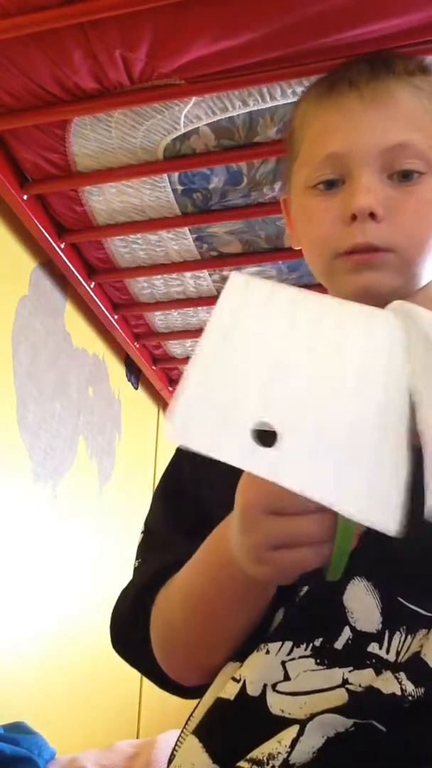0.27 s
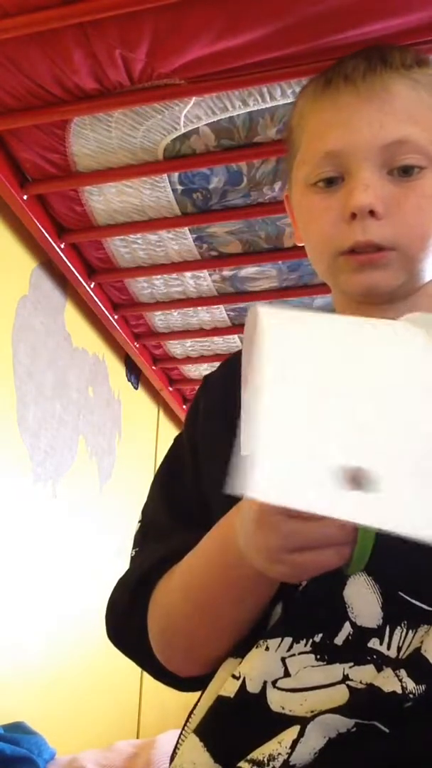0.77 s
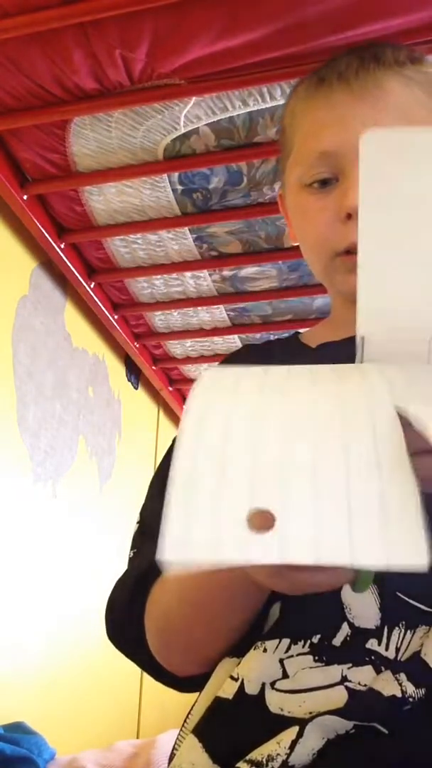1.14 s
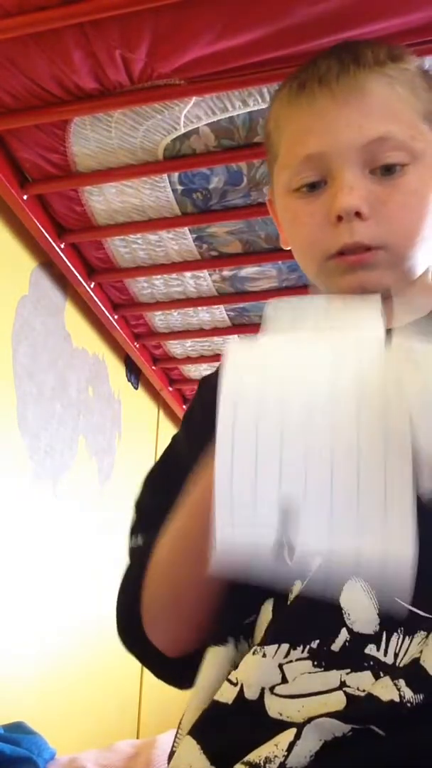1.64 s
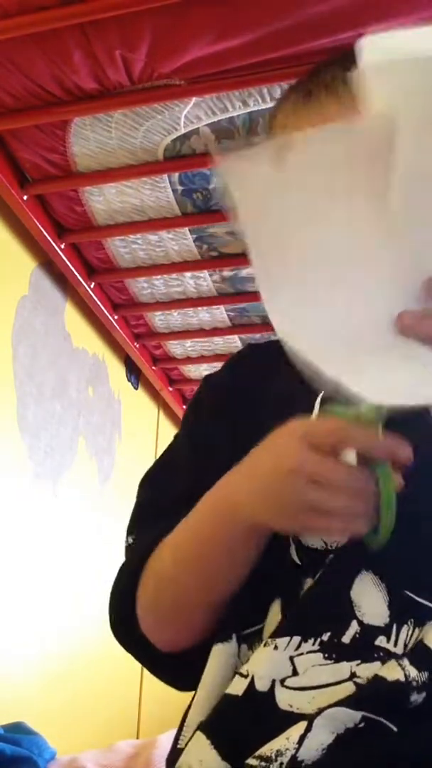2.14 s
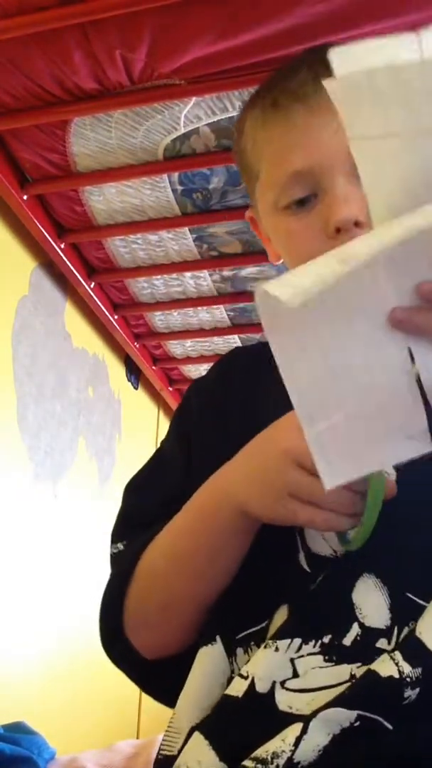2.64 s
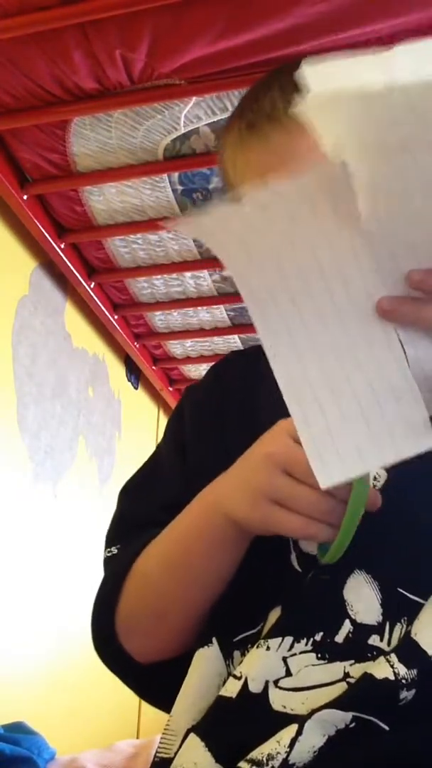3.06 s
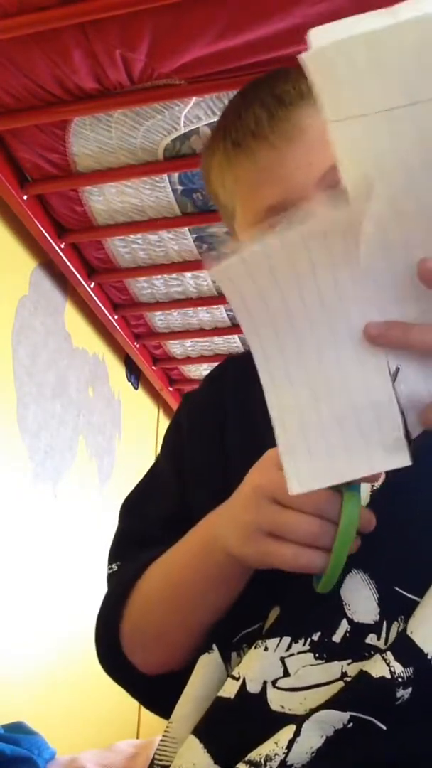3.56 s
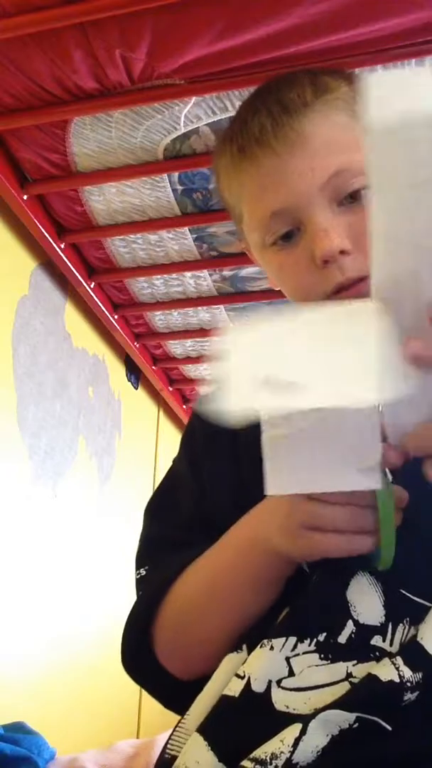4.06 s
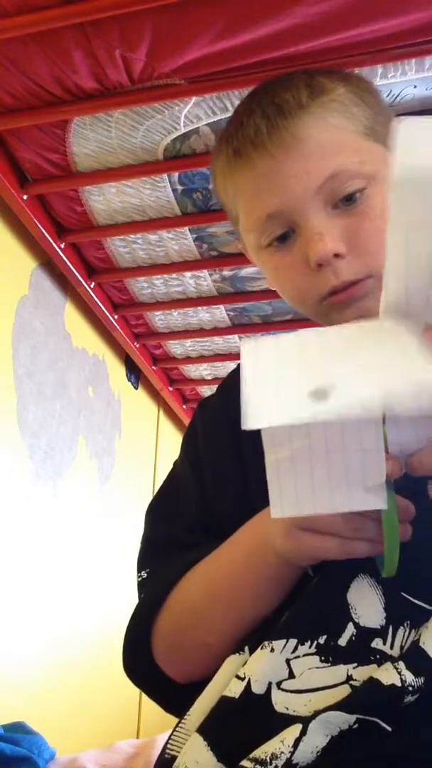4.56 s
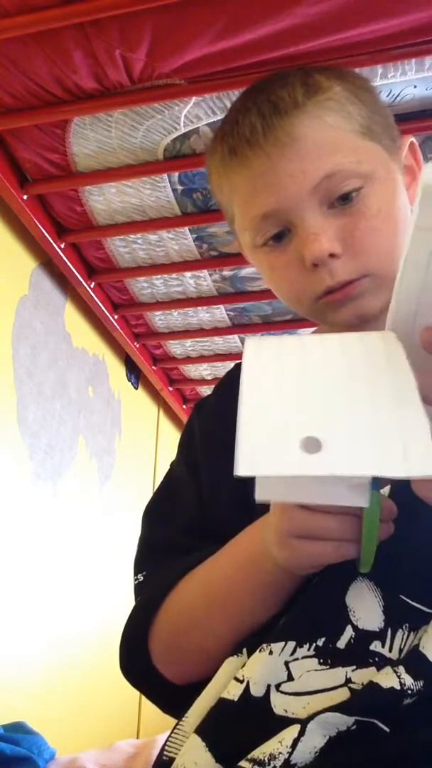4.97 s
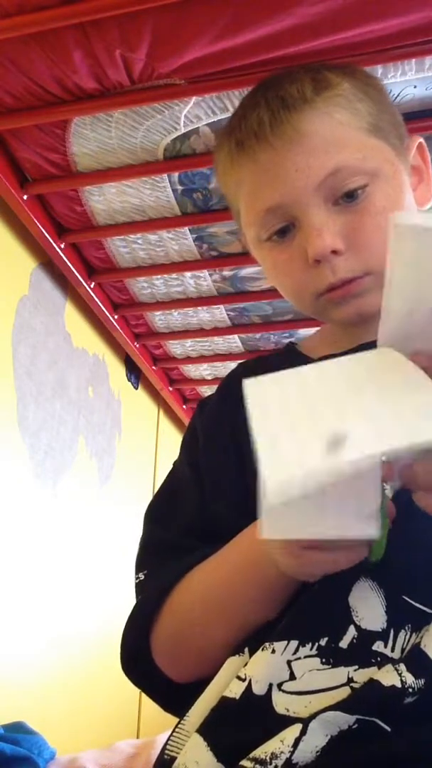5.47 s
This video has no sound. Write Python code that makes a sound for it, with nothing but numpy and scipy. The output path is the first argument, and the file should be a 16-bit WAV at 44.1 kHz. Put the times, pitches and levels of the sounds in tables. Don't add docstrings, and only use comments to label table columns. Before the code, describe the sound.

Hands turn and flex a sheet of notebook paper near a phone in a small, soft room. A faint brush leads to quick crackles, hissing strokes and a crisp cluster around two seconds. The middle turns quieter, with light rubbing and dull finger knocks, then a brighter burst of creases comes at five seconds and a last brush near the end. Low room rumble lies behind.

```python
import sys
import numpy as np
from scipy import signal
from scipy.fft import rfft, irfft
from scipy.io import wavfile
from scipy.ndimage import uniform_filter1d

SR = 44100
rng = np.random.default_rng(int(sys.argv[2]) if len(sys.argv) > 2 else 0)


def int16_out(signal):
    q = np.round(np.clip(np.atleast_2d(signal).T, -1, 1) * 32767)
    wavfile.write(sys.argv[1], SR, q.astype(np.int16))


def rack_gain(trim_db):
    fader = np.asarray(trim_db, float)
    return 10 ** (fader / 20)


N = 252252


def evened(x):
    return x / np.sqrt(np.mean(x ** 2) + 1e-20)


def smooth_noise(shape, width):
    once = uniform_filter1d(rng.standard_normal(shape), width)
    return evened(uniform_filter1d(once, width))


def read(points, hz):
    f, value = np.transpose(points)
    return np.interp(np.log(hz + 1), np.log(f + 1), value)


def filtered(x, points):
    gain = rack_gain(read(points, np.fft.rfftfreq(N, 1 / SR)))
    return evened(irfft(rfft(x) * gain, N))


def coloured(x, points, patchy_db, extra_db):
    hz, t, z = signal.stft(x, SR, nperseg=256, noverlap=192)
    over_hz = uniform_filter1d(rng.standard_normal(z.shape), 3, 0)
    patches = evened(uniform_filter1d(over_hz, 40, 1))
    z = z * rack_gain(read(points, hz)[:, None] + patchy_db * patches + extra_db)
    return signal.istft(z, SR, nperseg=256, noverlap=192)[1][:N]


def causal(db):
    log = np.maximum(db, -100) * np.log(10) / 20
    circle = np.concatenate([log, log[..., -2:0:-1]], axis=-1)
    phase = -signal.hilbert(circle).imag[..., :log.shape[-1]]
    return np.exp(log + 1j * phase)


def slips(shape, per_s, spread_db, hiss):
    hit = rng.random(shape) < per_s / SR
    size = rng.exponential(1, shape)
    sign = np.sign(rng.standard_normal(shape))
    clicks = hit * sign * rack_gain(spread_db * np.minimum(size, 4))
    return evened(clicks) + hiss * rng.standard_normal(shape)


# (time [s], pressure [dB])
LIGHT_DRAG = [(0.0, -73.5), (0.85, -70), (1.07, -66), (1.2, -54), (1.33, -50), (1.5, -52.5), (1.88, -56.5),
              (2.06, -68), (2.21, -47.5), (2.34, -57), (2.5, -76), (2.88, -67), (3.0, -73), (3.38, -73),
              (3.56, -56), (4.5, -63), (5.18, -66), (5.66, -75)]
# (start [s], hold [s], pressure [dB], brightness [dB], fizz [dB])
JERKY_STROKES = [(0.0, 0.0014, -46.5, -8, -18), (0.187, 0.008, -33, -9, -15), (0.6, 0.016, -40.5, -3, -8),
                 (0.652, .01, -40.5, -1, -8.5), (0.866, 0.13, -38.5, 3, -1.5),
                 (2.048, 0.014, -63.5, 8, 1.2), (2.104, 0.02, -29, -2, -5),
                 (2.788, 0.042, -39.5, -2.3, -16.5), (3.387, 0.05, -50.5, -6, -23),
                 (3.572, 0.018, -51, 2, -10), (4.111, 0.02, -50, -6, -16), (4.455, 0.15, -57, -6, -16),
                 (4.957, 0.0035, -50, -7, -18), (5.019, 0.044, -37.5, -3, -11),
                 (5.204, .002, -39.5, -2, -14), (5.545, 0.01, -41, -19, -30)]
# (full pressure [s], hold [s], pressure [dB], brightness [dB], fizz [dB])
SWELLING_STROKES = [(0.236, 0.0029, -31.5, -1, -13), (0.832, .002, -59, -3, -12),
                    (0.99, 0.031, -37.5, -1.5, -11.5), (1.122, 0.015, -48.5, -2, -8),
                    (1.237, 0.052, -43.5, 0.5, -7.5), (1.36, 0.021, -44, 14.5, -3),
                    (1.592, 0.0017, -45.5, 19.5, 18), (1.63, 0.047, -45.5, -14, -1),
                    (1.706, 0.011, -31, -0.5, -8.5), (1.915, 0.012, -47, 0, -6), (2.24, 0.03, -49, 5, 3),
                    (2.295, 0.0043, -49, -5, -13), (2.704, 0.001, -40, -7.5, -20),
                    (3.03, 0.01, -51.5, -4.5, -14), (3.193, 0.03, -49, -5, -11),
                    (3.327, 0.0022, -54, -4, -15), (3.44, 0.0012, -46.5, 2, -4),
                    (3.654, 0.024, -38.5, -2.5, -17), (3.81, 0.0022, -48.5, -4, -15),
                    (3.915, 0.055, -50, -7, -14), (4.01, 0.053, -59.5, 16, 12),
                    (4.27, 0.012, -56, -23, -23), (4.824, 0.0067, -48, -9, -16), (5.6, 0.04, -41, 2.5, -8),
                    (5.715, .004, -54, 1.5, -6)]
# (time [s], depth [dB])
HAND_LIFTS = [(0.169, 17), (1.203, 9.5), (1.49, 11), (2.163, 3.5), (2.76, 2), (3.365, 5), (3.735, 10),
              (3.854, 7.5), (4.228, 10), (4.77, 13), (5.643, 16.5)]


def hand(t):
    power = rack_gain(2 * np.interp(t, *np.transpose(LIGHT_DRAG)))
    bright, fizz = power * -1, power * -7.5
    # (strokes, rise [dB/s], fall [dB/s])
    for strokes, rise, fall in [(JERKY_STROKES, 2499.5, 361), (SWELLING_STROKES, 290, 324)]:
        for s, hold, db, bright_db, fizz_db in strokes:
            before, after = np.maximum(s - t, 0), np.maximum(t - s - hold, 0)
            stroke = rack_gain(2 * (db - rise * before - fall * after))
            power = power + stroke
            bright = bright + stroke * bright_db
            fizz = fizz + stroke * fizz_db
    lift_s = 0.014
    lift_db = sum(db * np.exp(-((t - s) / lift_s) ** 2) for s, db in HAND_LIFTS)
    return 10 * np.log10(power) - lift_db, bright / power, fizz / power


# (frequency [Hz], level [dB])
FIBRE_COLOUR = [(410, -40), (700, -27.5), (863, -17.5), (1110, -8), (2100, -4), (7010, -9), (13700, -17),
                (15200, -20), (16000, -39.5)]
# (frequency [Hz], width [Hz], level [dB])
CURVED_PANELS = [
    (2730, 310, 4.5),
    (4720, 310, 5),
    (6900, 480, 4),
    (8530, 350, -4.5),
    (3700, 330, -3),
]
# (frequency [Hz], level [dB])
FLAP_COLOUR = [(35, -42.5), (60, -10), (184, -4), (312, -8), (515, -0.5), (850, -12.5), (1300, -14.5),
               (1690, -33), (2860, -120)]


def sliding():
    t = np.arange(N) / SR
    clumps = smooth_noise(N, 70)
    drive = evened(slips(N, per_s=4000, spread_db=2.7, hiss=1.0) * rack_gain(2.2 * clumps))

    hz = np.fft.rfftfreq(256, 1 / SR)
    frames = np.arange(-(-N // 64) + 1) * 64 / SR
    pressure_db, bright_db, fizz_db = hand(frames)
    bright = np.interp(hz, [3000, 5200, 6200, 10500], [0, 1, 1, 0])[:, None]
    fizz = np.interp(hz, [6200, 10500], [0, 1])[:, None]
    upper_db = bright * (bright_db + 0.5) + fizz * (fizz_db + 8.0)

    bends = evened(uniform_filter1d(rng.standard_normal((len(CURVED_PANELS), len(frames))), 60))
    ring_db = 0
    for (centre, width, db), bend in zip(CURVED_PANELS, bends):
        distance = (hz[:, None] - centre * (1 + 0.07 * bend)) / width
        ring_db = ring_db + db * (1 + 0.45 * bend) / (1 + distance ** 2)
    rub = coloured(drive, FIBRE_COLOUR, patchy_db=2.8, extra_db=upper_db + ring_db)

    lumps = smooth_noise(N, 900)
    flap = filtered(rng.standard_normal(N) * rack_gain(2.6 * lumps), FLAP_COLOUR)
    pressure_db = np.interp(t, frames, pressure_db)
    flap_db = 0.62 * uniform_filter1d(pressure_db, 600) - 28.5
    return rack_gain(pressure_db + 9.0) * rub + rack_gain(flap_db) * flap


# (time [s], level [dB], ring [Hz], tilt [dB/octave])
CREASE_POPS = [(1.5325, -36, 9000, 6), (4.2718, -36, 3100, 0), (0.6518, -20, 2750, 2.5),
               (0.1952, -22, 3900, -1), (0.228, -18, 2630, 0), (2.0956, -26.5, 1760, -7),
               (2.1164, -12, 4700, 2), (1.7028, -15.5, 6260, 1.8), (2.2885, -21.5, 2260, -0.5),
               (4.825, -24.5, 5240, 0.5), (4.9415, -33.5, 2400, -3), (4.8766, -42, 2480, -6),
               (4.9697, -34, 2400, -3)]
# (time [s], level [dB], ring [Hz], tilt [dB/octave])
SHORT_TICKS = [(0.6303, -32.5, 3400, 10), (0.895, -30, 2560, -4.5), (1.1597, -40.5, 2880, 4.5),
               (1.4148, -38, 6930, 0.5), (1.6837, -50, 1170, 3), (1.6915, -28, 1730, -1),
               (1.8977, -38, 2560, 0), (1.9655, -31.5, 3020, 2), (2.1285, -20, 5190, 1),
               (2.1736, -22, 2180, -1.5), (2.618, -42.5, 2650, -8.5), (2.637, -30, 2500, -3),
               (2.8655, -39, 2060, -6), (3.6381, -34.5, 2200, -0.5), (4.919, -52.5, 2580, -2),
               (4.9787, -47, 2410, -1), (4.9902, -40.5, 2620, -1.5), (5.399, -60.5, 2490, -2),
               (5.4626, -48.5, 3200, -4.5), (5.6752, -43, 3050, 5)]
# (time [s], level [dB], ring [Hz], tilt [dB/octave])
FINGER_KNOCKS = [
    (0.0916, -44, 840, -8),
    (0.4835, -48, 800, -6.5),
    (2.501, -57, 695, -13),
    (2.607, -47.5, 650, -3.5),
    (2.9722, -43.5, 610, -11),
    (4.0614, -45, 600, -6.5),
    (4.2483, -52, 594, -6),
    (4.3323, -42, 1200, -5),
    (4.739, -53.5, 690, -5.5),
]
# (peak time [s], level [dB], ring [Hz], tilt [dB/octave], build-up [ms])
SLOW_BUCKLES = [(0.2834, -35, 3830, -0.5, 2.4), (0.3126, -33, 2200, 1.5, 5.3),
                (0.6486, -21.5, 7100, 4, 3.3), (1.0863, -43, 2810, -1, 5.3), (1.187, -47.5, 3250, 3, 2.3),
                (1.2404, -37, 1680, -6.5, 3.7), (1.2746, -39.5, 3270, 3.5, 7.7), (1.5965, -27, 6000, 1, 6),
                (1.3664, -33.5, 3320, -3, 3.7), (1.6483, -31.5, 5640, 0.5, 7.7),
                (1.7171, -25, 3700, -1.5, 5.8), (1.9175, -25.5, 2210, -1.9, 8.4),
                (1.979, -45, 6120, 2, 6.3), (3.4475, -34.5, 2460, 0, 3.3), (3.6251, -33, 4360, 1.5, 4.1),
                (4.9543, -28, 2240, 0, 1.4), (5.0255, -20.5, 7500, 0.5, 2.7), (5.031, -24, 4940, 1, 4),
                (5.0741, -29.5, 2980, 0.8, 1.3), (5.1149, -32.5, 2400, -1, 4.1),
                (5.2024, -23.5, 4680, -1.3, 3.9)]
# (peak time [s], level [dB], ring [Hz], tilt [dB/octave], tail [ms])
LONG_CRUMPLES = [(1.344, -38, 5500, 5, 10), (1.7055, -23, 4600, 0, 6), (2.2915, -29, 4000, 1, 4),
                 (3.215, -48, 2500, -3, 20), (0.1427, -40, 2850, -1, 3), (0.5836, -34, 7500, 2, 6),
                 (0.606, -34, 3000, 0, 6), (0.859, -47, 1400, 0, 10), (5.0188, -35.5, 5000, 2, 5),
                 (5.198, -27.5, 2500, -1.5, 4.8), (0.5991, -27.5, 7700, -0.5, 7.4),
                 (0.99, -41.5, 3300, 3, 18), (1.1141, -43, 7000, 0, 8.1), (1.26, -51, 1970, -9, 7.3),
                 (1.508, -31.5, 5130, 6.5, 10), (1.5548, -31.5, 5250, 3.5, 34), (1.584, -28, 5860, 2, 23),
                 (2.1085, -18, 4400, -2, 7.7), (2.698, -36.5, 2670, -5, 10), (2.826, -40.5, 2540, -7, 19),
                 (3.511, -47, 2380, -3.5, 13), (3.9186, -48, 2830, -3, 27), (3.959, -45, 2280, -5.5, 8.2),
                 (4.1081, -44, 1730, -6.5, 17), (4.195, -48, 1740, -8.5, 13.5),
                 (4.363, -54.5, 7460, 22, 23), (4.42, -52, 3100, -0.5, 7.5), (4.452, -48.5, 2800, 1, 54),
                 (4.4937, -45.5, 2600, -3, 21), (4.5618, -48, 3220, -0.5, 4.3), (5.571, -36, 2980, 1.5, 33),
                 (5.584, -39.5, 7400, 11, 8.5)]
# (time [s], peak [dB], ring [Hz], tilt [dB/octave])
FIBRE_PRICKS = [(0.1514, -43, 2880, 1), (0.1564, -45, 7000, 4), (0.1704, -46, 5500, 2),
                (0.1796, -36, 2420, 0), (0.5082, -52, 7000, 5), (0.7874, -52, 9000, 10),
                (0.8714, -30, 1200, -3), (1.2101, -38, 4670, 3), (1.44, -38, 9000, 6),
                (2.1894, -27, 5700, 3), (2.2054, -43, 2340, -1), (2.3284, -43, 9000, 4),
                (2.3414, -44, 2900, 2), (2.3657, -45, 6000, 1), (2.388, -44, 4520, -2),
                (2.402, -41, 5500, 0), (2.4244, -50, 2740, -1), (2.6064, -38, 5500, -1),
                (2.8844, -46.5, 1980, -1), (2.9635, -47, 1880, -4), (3.0794, -53, 5000, 0),
                (3.13, -52, 9000, 6), (3.2494, -46, 6500, 3), (3.3932, -46, 1990, -2),
                (3.7609, -46, 4560, 0), (3.7783, -43, 4590, 2), (3.7973, -40, 4510, 0),
                (3.8985, -41, 3110, -2), (4.0023, -43, 3780, -1), (4.1587, -41, 5500, 2),
                (4.3181, -45, 7000, 5), (4.3456, -49, 7000, 4), (4.59, -47, 3310, 0), (4.809, -42, 5070, 4),
                (5.0557, -26, 2360, 2), (5.1056, -31, 2660, 0.5), (5.4899, -51, 3320, 0),
                (5.657, -38, 7000, 3)]


def creases():
    rows = []
    # (creases, (rise [ms], fall [ms]))
    for kind, rise_fall in [(CREASE_POPS, (0.62, 1.6)), (SHORT_TICKS, (3.64, 2.6)), (FINGER_KNOCKS, (2.4, 3.3))]:
        rows += [(*row, *rise_fall) for row in kind]
    for *row, rise in SLOW_BUCKLES:
        rows.append((*row, rise, 3.7 + 0.083 * rise))
    for *row, tail in LONG_CRUMPLES:
        rows.append((*row, 1.9 + 0.099 * tail, tail))
    for s, peak_db, hz, tilt in FIBRE_PRICKS:
        rows.append((s, peak_db - 10.5, hz, tilt, 0.74, 2.0))
    return rows


# (frequency [Hz], level [dB])
SHEET_COLOUR = [(88, -46), (150, -10.5), (514, -4.5), (905, -5.5), (2760, 5), (5680, 1), (6510, -1),
                (7180, -0.5), (12700, -14), (15100, -21), (16000, -26)]


def snaps():
    s, level_db, ring_hz, tilt, rise, fall = np.transpose(creases())[:, :, None]
    ms = (np.arange(4096) - 1024) * 1000 / SR
    hz = np.fft.rfftfreq(4096, 1 / SR)
    build_db = -9 * abs(ms / np.maximum(rise - 0.4, 0.05)) ** 2.4
    fade_db = -9 * ms / np.maximum(fall, 0.2)
    shape_db = np.where(ms < 0, build_db, fade_db)
    drive = slips((len(s), 4096), per_s=7700, spread_db=1.5, hiss=0.84) * rack_gain(shape_db)
    drive += 1.9 * (ms == 0) * np.exp(-rise / 1.7)

    modes = smooth_noise((len(s), len(hz)), 30)
    ring_db = 6.5 / (1 + ((hz - ring_hz) / (280 + 0.07 * ring_hz)) ** 2)
    tilt_db = tilt * np.log2(np.clip(hz, 700, 14000) / 3500)
    colour_db = read(SHEET_COLOUR, hz) + ring_db + 1.42 * modes + tilt_db
    sound = irfft(rfft(drive) * causal(colour_db), 4096)
    loudest = np.sqrt(uniform_filter1d(sound ** 2, 100).max(1, keepdims=True))
    sound *= rack_gain(level_db) / loudest

    out = np.zeros(N + 8192)
    np.add.at(out, np.round(s * SR).astype(int) + np.arange(4096), sound)
    return out[1024:N + 1024]


# (peak time [s], level [dB], frequency [Hz], swell [ms])
AIR_PUFFS = [(0.048, -53.5, 584, 3.1), (0.258, -42, 1050, 4), (0.312, -45, 1150, 2.5), (0.602, -42, 200, 5),
             (0.632, -46, 210, 6), (0.649, -35, 924, 2.48), (0.652, -38, 460, 4), (0.66, -44, 210, 6),
             (0.835, -58, 460, 6.2), (0.898, -34, 194, 3.4), (0.985, -41.5, 201, 3.6),
             (1.372, -47.5, 608, 5.0), (1.5, -46.5, 503, 2.7), (1.689, -34, 645, 5.0), (1.71, -38, 800, 6),
             (1.858, -55, 358, 3.6), (1.92, -36.5, 557, 3.5), (2.108, -28, 495, 3.5), (2.122, -36, 260, 6),
             (2.113, -31, 760, 4), (2.174, -37, 557, 4.2), (2.255, -54, 119, 30), (2.27, -43.5, 1890, 6.3),
             (2.272, -50, 3850, 6), (2.29, -42.5, 658, 3.4), (2.37, -55, 1850, 3.5),
             (2.387, -60, 472, 30.0), (2.461, -77.5, 1830, 6.5), (2.5, -56, 141, 5.2),
             (2.636, -56, 290, 4.74), (2.793, -46, 500, 4), (2.9, -60, 1950, 12), (2.97, -55, 200, 8),
             (2.977, -49, 657, 5.0), (3.122, -63, 187.4, 37), (3.638, -56, 111, 8.4),
             (3.831, -46.5, 466, 3.9), (4.564, -50, 152, 5.1), (4.964, -48, 565, 5.1),
             (5.205, -43.5, 557, 3.54), (5.549, -36, 1316, 2.66)]


def puffs():
    s, level_db, hz, swell = np.transpose(AIR_PUFFS)[:, :, None]
    ms = np.arange(8192) * 1000 / SR
    detune, phase = rng.random((2, len(s), 1))
    drift = np.cumsum(rng.standard_normal((len(s), len(ms))), axis=1)
    wander = drift * 0.003 * np.sqrt(np.minimum(hz, 700))
    main = np.sin(2 * np.pi * hz * ms / 1000 + wander)
    neighbour_hz = hz * (0.64 + 1.1 * detune)
    neighbour = np.sin(2 * np.pi * (neighbour_hz * ms / 1000 + phase))
    u = ms / np.clip(swell, 1, 40)
    sound = rack_gain(level_db) * (main + 0.56 * neighbour) * u * np.exp(1 - u)

    out = np.zeros(N + 16384)
    start = np.round((s - swell / 1000) * SR).astype(int)
    np.add.at(out, start + np.arange(8192), sound)
    return out[:N]


# (frequency [Hz], time to fall 60 dB [s])
ROOM_DECAY = [
    (250, 0.28),
    (700, 0.16),
    (2000, 0.035),
    (5000, 0.098),
    (12000, 0.044),
]


def room(x):
    taps = np.zeros(SR // 2)
    at = np.arange(180, SR // 2 - 20, 20)
    taps[at + rng.integers(0, 20, len(at))] = rng.choice([-1., 1.], len(at))
    hz, t, z = signal.stft(taps, SR, nperseg=256)
    decay = rack_gain(-60 * t / read(ROOM_DECAY, hz)[:, None])
    tail = signal.istft(z * decay, SR, nperseg=256)[1]
    return signal.fftconvolve(x, tail / np.linalg.norm(tail))[:N]


# (frequency [Hz], level [dB])
AIR_COLOUR = [(15, -47), (25, -36), (56, 13), (99, 10), (326, 8), (531, -18), (1160, -34.5), (1440, -10),
              (5000, -32), (6560, -26.5), (7310, -27.5), (13600, -20), (16000, -39.5)]


def quiet_air():
    return rack_gain(-66.5) * filtered(rng.standard_normal(N), AIR_COLOUR)


def scene():
    rub = sliding()
    cracks = snaps() + puffs()
    tail = room(rack_gain(-15.0) * cracks + rack_gain(-21.0) * rub)
    return (rub + cracks + tail + quiet_air())[None]


def top_cut(x):
    return signal.sosfilt(signal.butter(12, 16450, fs=SR, output="sos"), x)


def record(dry):
    edge_hz = 15350
    low_pass = signal.firwin(95, edge_hz, window=("kaiser", 6), fs=SR)
    mix = signal.oaconvolve(dry, low_pass[None], "same")
    return top_cut(mix)


dry = scene()
out = record(dry)
int16_out(out)
```